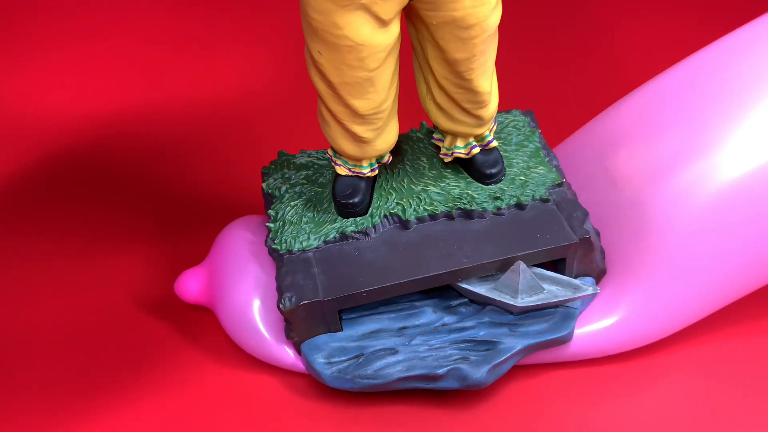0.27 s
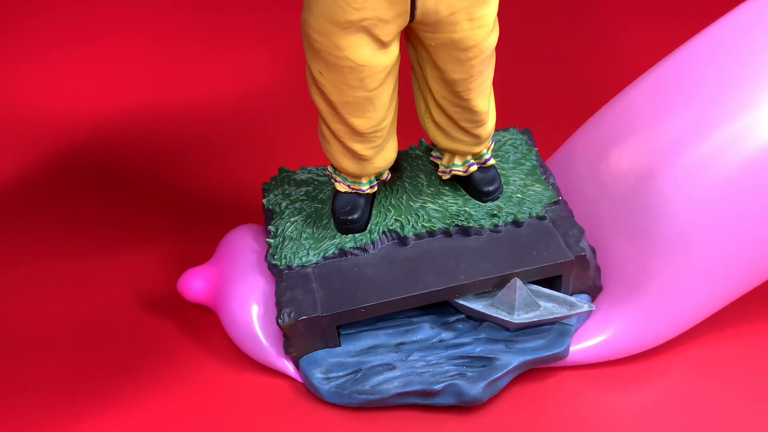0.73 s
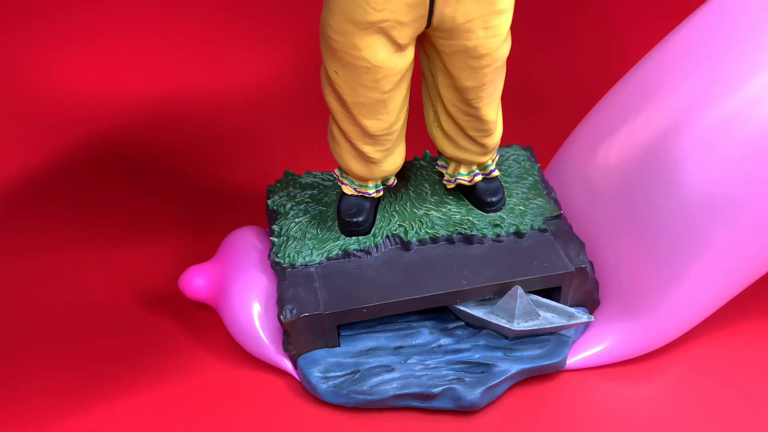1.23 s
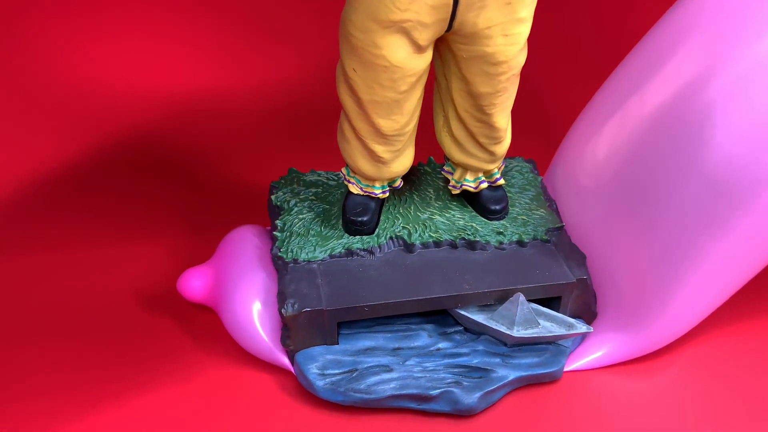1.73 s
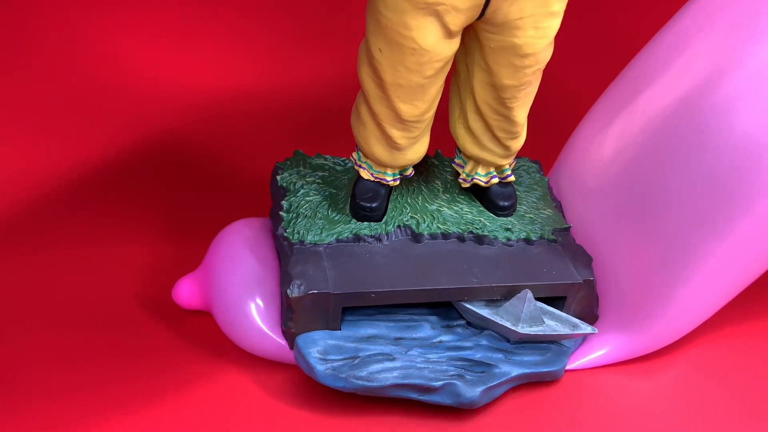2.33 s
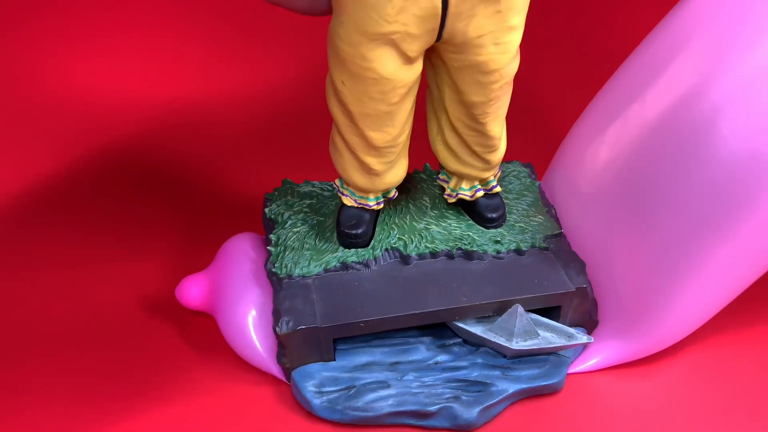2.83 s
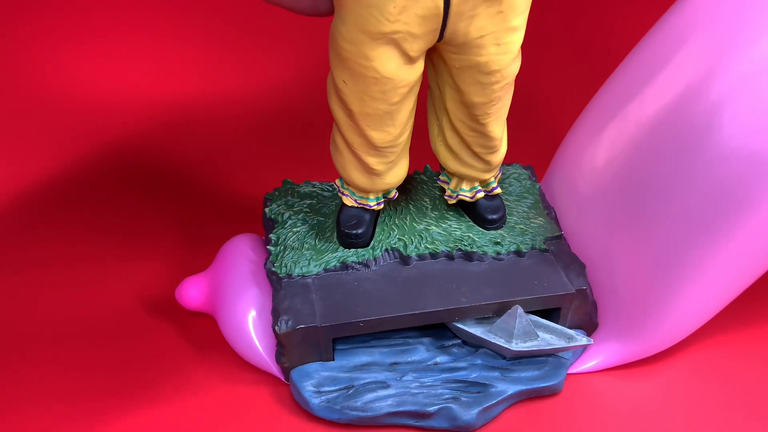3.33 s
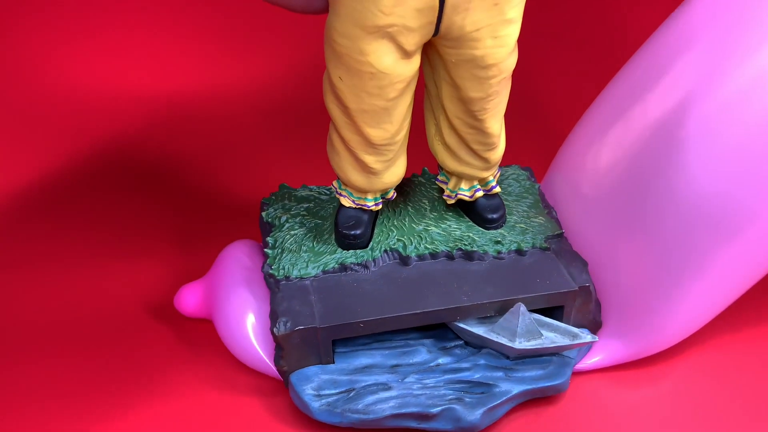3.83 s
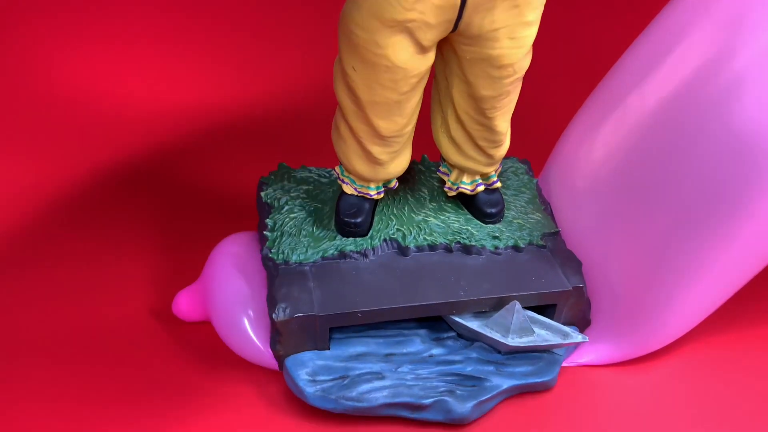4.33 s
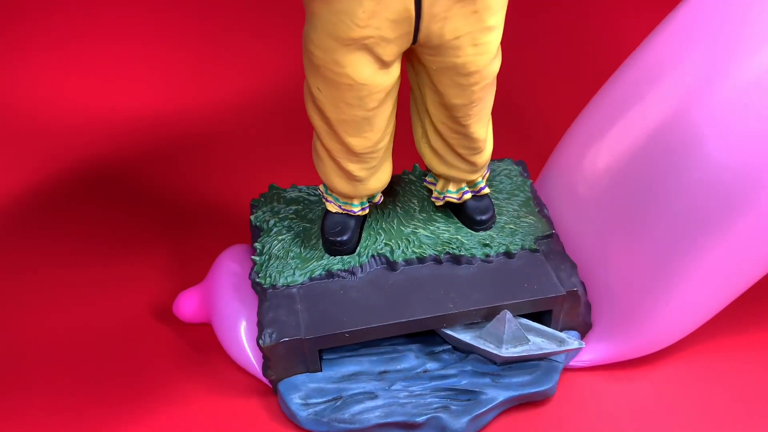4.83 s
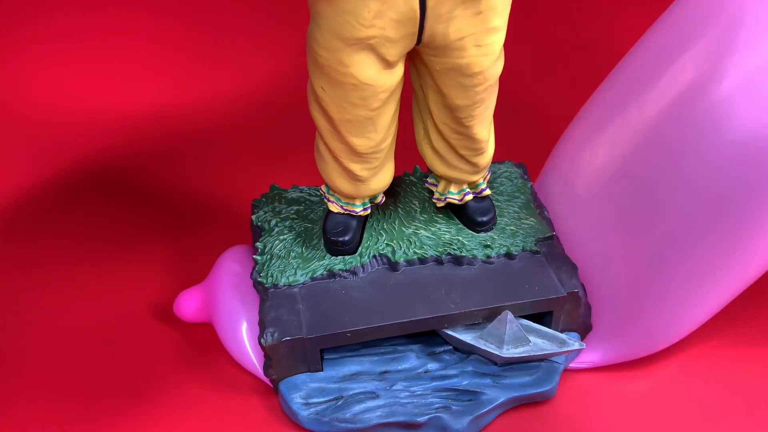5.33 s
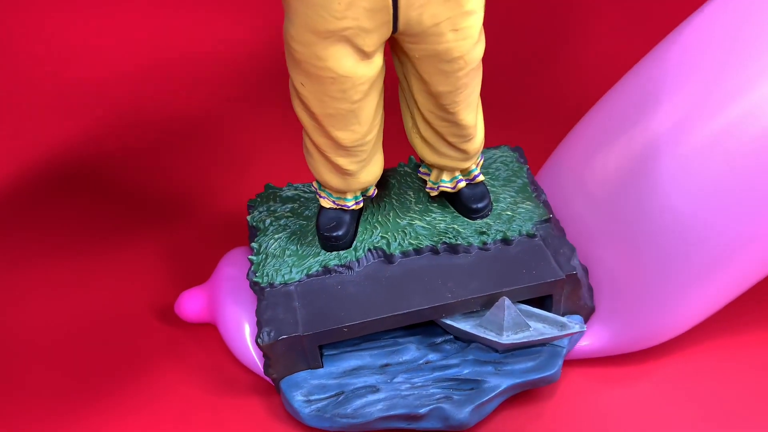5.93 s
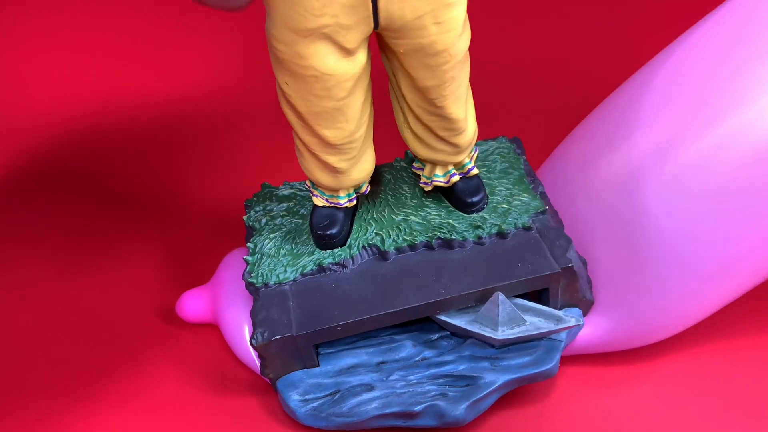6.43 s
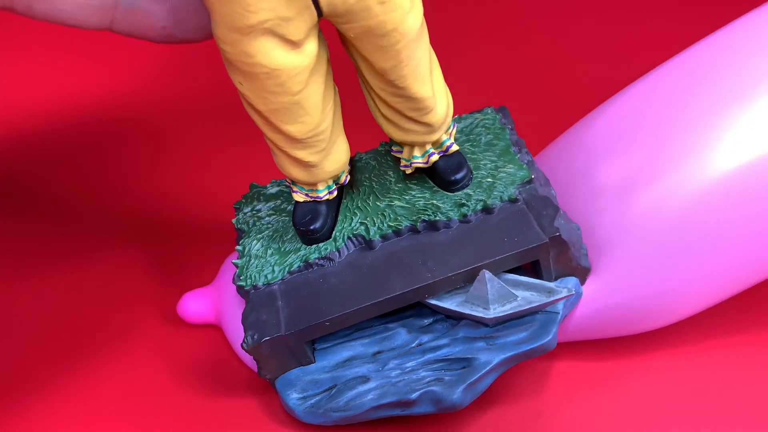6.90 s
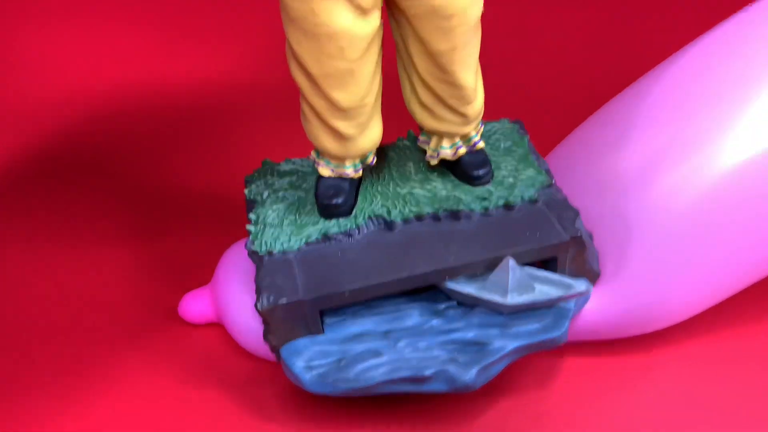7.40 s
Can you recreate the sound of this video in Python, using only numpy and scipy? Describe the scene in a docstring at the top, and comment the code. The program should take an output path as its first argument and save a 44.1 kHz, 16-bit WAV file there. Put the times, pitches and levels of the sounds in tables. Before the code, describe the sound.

A hard base is pressed and rocked on an inflated rubber balloon, its tacky skin crackling and snapping sharply over soft hollow booms.

```python
"""Stick-slip on a rubber balloon

A hard base is pressed and rocked on an inflated balloon lying on a table, close to a spaced microphone pair.
The tacky skin peels in a fine crackle of random releases and slips in sharp snaps of filtered noise.
Jolts tap dully and ring the air inside as damped modes, and steady pressure makes those modes groan.
Low noise rumbles in the table; dull puffs, a faint scattered tail and a steady hiss complete the scene."""
import sys
import numpy as np
from scipy import signal
from scipy.fft import rfft, irfft, next_fast_len
from scipy.io import wavfile

SR = 44100
rng = np.random.default_rng(int(sys.argv[2]) if len(sys.argv) > 2 else 0)


def output_pcm(signal):
    """Save a mono or channel-first signal as 16-bit PCM at the path in sys.argv[1].

    Samples are clipped to [-1, 1] before scaling.
    """
    pcm = np.clip(np.atleast_2d(signal).T, -1, 1) * 32767
    wavfile.write(sys.argv[1], SR, np.round(pcm).astype(np.int16))


N = 337806
FFT_SIZE = next_fast_len(N + SR // 4)
HZ = np.maximum(np.arange(FFT_SIZE // 2 + 1) * SR / FFT_SIZE, 1)   # spectrum grid, kept above zero for logarithms


def from_db(db):
    """Level law: decibels to amplitude gain."""
    return 10 ** (np.asarray(db) / 20)


def rms_one(x):
    """Normalization: scale to rms 1."""
    return x / np.sqrt(np.mean(x ** 2) + 1e-20)


def in_time(rows):
    """Linear interpolation: the columns of a time curve at every sample."""
    s, *columns = np.transpose(rows)
    return [np.interp(np.arange(N) / SR, s, column) for column in columns]


def through(x, response):
    """Linear filtering: multiply the spectrum by a response on the HZ grid."""
    size = 2 * (len(HZ) - 1)
    return irfft(rfft(x, size) * response, size)[..., :N]


def colour(x, points):
    """Spectral shaping: a zero-phase gain curve, interpolated over log frequency."""
    hz, db = np.transpose(points)
    return through(x, from_db(np.interp(np.log(HZ), np.log(hz), db)))


def band(x, low_hz, high_hz):
    """Band limitation: a causal Butterworth band-pass."""
    sos = signal.butter(2, [low_hz, min(high_hz, .45 * SR)], "band", fs=SR, output="sos")
    return signal.sosfilt(sos, x + 1e-18)


def drift(rate_hz):
    """Random modulation: noise under a two-pole low-pass, scaled to rms 1."""
    r = np.exp(-80 * np.pi * rate_hz / SR)   # one step is 40 samples
    noise = rng.standard_normal(N // 40 + 2002)
    slow = signal.lfilter([1], [1, -2 * r, r * r], noise)[2000:]   # skip the filter's start
    return np.interp(np.arange(N) / 40, np.arange(len(slow)), rms_one(slow))


def ring(clicks, hz, t60_s):
    """Damped resonance: a unit click starts a decaying sine of height about 1."""
    r, w = from_db(-60 / (t60_s * SR)), 2 * np.pi * hz / SR
    return signal.lfilter([0, np.sin(w)], [1, -2 * r * np.cos(w), r * r], clicks + 1e-18)


def partly_alike(shape, own):
    """Partial coherence: two noises, one per microphone, each with a share of power of its own."""
    both, left, right = rng.standard_normal((3, *shape))
    own = np.clip(own, 0, 1)
    return np.sqrt(1 - own) * both + np.sqrt(own) * np.array([left, right])


def pair(x, lag_s, turn_rad):
    """Arrival-time difference: left hears the source lag_s later, its phase turned by a fixed angle."""
    turned_left = through(x[0], np.exp(1j * (turn_rad - 2 * np.pi * HZ * lag_s)))
    return np.array([turned_left, x[1]])


# Resonances of the taut skin beside the contact: pitch_hz [Hz], level_db [dB], t60_s [s]
DRUM_MODES = [(1930, -32, 0.0026), (2203, -21.5, 0.0053), (3280, -40.5, 0.0019)]
DRUM_WANDER_DB = 4   # rms wander of each resonance


def drum(x):
    """Modal response: the taut skin drums briefly, each pitch coming and going as the contact shifts."""
    out = 0
    for hz, level_db, t60_s in DRUM_MODES:
        out = out + from_db(level_db + DRUM_WANDER_DB * drift(6.2)) * ring(x, hz, t60_s)
    return out


# Spells of fine peeling as the base rocks: full_strength_s [s], held_s [s], treble_db [dB],
# swell [dB per s], fade [dB per s], body_db [dB against treble]
PEELING_SPELLS = [(0.0, 0.014, -54, 300, 226.5, 0.5), (0.18, 0.115, -66.5, 501, 400.5, 2.5),
                  (0.329, 0.025, -62, 499, 300, 0), (0.9, 0.021, -69.5, 201, 153.5, -2),
                  (1.2, 0.0076, -53, 181, 107.5, -10), (1.529, 0.027, -48, 171, 247, -4.5),
                  (1.77, 0.13, -42.5, 108.5, 81, -5.5), (2.02, 0.053, -54.5, 292, 99, -7),
                  (2.33, 0.048, -43.5, 174.5, 302.5, 0.5), (2.5, 0.024, -54.5, 201.5, 298.5, 0.5),
                  (2.64, 0.01, -54.5, 592.5, 100.5, -6.5), (2.802, 0.11, -46, 394.5, 141.5, -6),
                  (3.2, 0.01, -56, 202.5, 189.5, -10), (3.479, 0.02, -47.5, 302, 192.5, -5),
                  (3.68, 0.046, -44.5, 353.5, 91.5, -7), (4.112, 0.0068, -47, 599, 237.5, -4.5),
                  (4.222, 0.015, -34, 601.5, 74.5, -2), (4.733, 0.045, -43, 88.5, 197, -5.5),
                  (5.14, 0.01, -68, 317.5, 144.5, -8.5), (5.331, 0.02, -68, 114.5, 123.5, -29),
                  (5.533, 0.0084, -50.5, 350, 101, -2.5), (5.584, 0.018, -40.5, 399, 249.5, -3.5),
                  (6.001, 0.23, -66.5, 294, 79.5, -3), (6.267, 0.01, -50.5, 202.5, 77, -5.5),
                  (6.661, 0.15, -55, 149.5, 113.5, 0), (6.88, 0.015, -51.5, 66, 162.5, -1),
                  (7.362, 0.14, -58.5, 452, 96, 0), (7.48, 0.09, -41, 150, 150, -0.5)]
BELLY_FOLLOWS = 1.5   # dB of belly for each dB of body


def rubbing():
    """Exponential envelopes: each spell swells, holds and fades at its own pace, in treble, body and belly."""
    step = 32   # samples between envelope points
    t, gains = np.arange(0, N + step, step) / SR, 0
    for s, held_s, treble_db, swell, fade, body_db in PEELING_SPELLS:
        db = treble_db - swell * np.maximum(s - t, 0) - fade * np.maximum(t - s - held_s, 0)
        gains = gains + from_db(db + body_db * np.array([[0], [1], [BELLY_FOLLOWS]]))
    return [np.interp(np.arange(N) / SR, t, gain) for gain in gains]


# Spectrum shaping the skin's releases: pitch_hz [Hz], level_db [dB]
SKIN_SPECTRUM = [(300, -6), (1000, 3), (1500, 4), (2200, 9.5), (3000, 11.5), (4000, 15), (6500, 8),
                 (9000, 8.5), (11500, 10), (14500, 3.5), (16000, 2.5), (17000, -57)]
# Band in which the squeezed part answers the peeling: centre_hz [Hz], width_hz [Hz], level_db [dB against treble]
BELLY_BAND = (900, 800, -9)
# How strongly the squeezed part answers: time_s [s], level_db [dB]
BELLY_CURVE = [(1.0, 4), (2.8, -2), (4.0, -7), (5.7, -5), (7.4, 3)]
DENSER = 0.3   # dB of release rate for each dB of treble


def peel(per_s, spread_db, clump_db, rustle, own):
    """Stick-slip as shot noise: tiny clumped releases, denser in strong spells, each leave a short rustle."""
    treble, body, belly = rubbing()
    dense = np.clip(rms_one(treble), .001, 10) ** DENSER
    # skewed sizes make a few releases much stronger
    sizes = from_db(spread_db * np.minimum(rng.exponential(1, N), 4)) * rng.choice([-1, 1], N)
    chance = per_s * dense * from_db(clump_db * drift(25)) / SR
    ticks = sizes * (rng.random(N) < chance) / np.sqrt(dense)   # denser ticks are made weaker
    after_power = signal.lfilter([1], [1, -np.exp(-1 / (0.00088 * SR))], ticks ** 2)
    grains = ticks + rustle * np.sqrt(after_power) * partly_alike((N,), own)
    grains = colour(grains, SKIN_SPECTRUM)

    top = rms_one(band(grains, 4820, 22000))
    middle = rms_one(band(grains, 1360, 3870)) + 0.5 * rms_one(drum(grains))
    hz, width_hz, belly_db = BELLY_BAND
    answer = rms_one(band(grains, hz - width_hz / 2, hz + width_hz / 2))
    hollow = from_db(belly_db + in_time(BELLY_CURVE)[0] + 4.0 * drift(15)) * answer
    return treble * top + body * middle + belly * hollow


def room(x, t60_s):
    """Diffuse scattering: convolution with a dull decaying noise tail, drawn for each microphone."""
    t = np.arange(SR // 2) / SR
    noise = rms_one(band(rng.standard_normal((2, len(t))), 600, 6700))
    tail = noise * from_db(-60 * t / t60_s) * (t > .003)
    return signal.fftconvolve(x, tail, axes=1)[:, :N]


# Pressure on table and balloon: time_s [s], rumble_db [dB], groan_db [dB]
PRESSURE = [(0.0, -70, -63.5), (0.64, -88, -93.5), (0.77, -61, -71), (1.04, -71, -75), (1.53, -62, -60.5),
            (2.6, -66, -77.5), (2.83, -60, -59), (3.42, -71.5, -81), (3.57, -47.5, -59), (3.7, -56, -67),
            (3.93, -72, -79), (4.27, -63, -65), (4.5, -66, -77.5), (4.73, -58, -83.5), (5.03, -83, -97),
            (5.95, -80, -75.5), (6.72, -62, -56), (7.15, -88.5, -102), (7.47, -72, -42), (7.66, -73, -51.5)]


def rumble(lumpy_db):
    """Low-frequency coherence: lumpy noise in the table, nearly alike at both microphones."""
    mid, side = band(rng.standard_normal((2, N)), 6.0, 83)
    both = rms_one(mid + .2 * side * [[1], [-1]])
    return from_db(in_time(PRESSURE)[0] + lumpy_db * drift(12)) * both


# Spectrum of the steady hiss: pitch_hz [Hz], level_db [dB]
HISS_SPECTRUM = [(18, -26), (30, 3.5), (443, -3.5), (1530, -9.5), (6380, -8), (13000, -16.5),
                 (16500, -41.5)]


def hiss(level_db):
    """Stationary noise: steady hiss, independent at the two microphones."""
    return from_db(level_db) * rms_one(colour(rng.standard_normal((2, N)), HISS_SPECTRUM))


# Push after a jolt: level_db [dB against the jolt], rise_s [s], fall_s [s]
PUSH = (-45, 0.008, 0.018)


def shudder(clicks, hz):
    """Resonant forcing: a soft knock, then an unsteady push at the mode's pitch travels along the balloon."""
    def decaying(time_s):
        pole = np.exp((2j * np.pi * hz - 1 / time_s) / SR)
        return signal.lfilter([1], [1, -pole], clicks + 1e-18).real

    level_db, rise_s, fall_s = PUSH
    push = (decaying(fall_s) - decaying(rise_s)) * (1 + 0.3 * drift(40))
    return 0.41 * clicks + from_db(level_db) * hz / 670 * push   # high modes are stirred most


# Jolts of the whole balloon: start_s [s], level_db [dB], sharpness [dB per octave]
JOLT_EVENTS = [(0.759, -55, -21), (1.407, -42, 11), (1.51, -53, -1.5), (1.65, -48.5, 8), (1.906, -47.5, 10),
               (2.219, -44, 8.5), (2.701, -45.5, 6.5), (2.851, -47, 13), (3.094, -54, 12.5),
               (3.18, -59.5, -4), (3.548, -48.5, -1), (3.991, -53, 6), (4.09, -52, 11),
               (4.225, -45.5, -9.5), (4.621, -55, 9), (4.677, -44, -9.5), (5.776, -43, 9),
               (5.999, -51.5, 13), (6.094, -39, 13.5), (6.679, -49, 3.5), (7.359, -48.5, 0)]
# Modes of the air inside: pitch_hz [Hz], level_db [dB], t60_s [s], pan_db [dB, left over right]
AIR_MODES = [(136, -10, 0.33, 11), (165.5, -2, 0.36, 0.5), (206.5, -7, 0.25, 8), (300, -8, 0.2, 0.5),
             (354, -7.5, 0.22, -0.5), (551, -27.5, 0.13, 16.5), (674, -9, 0.1, 7), (767, -21, 0.013, 12.5)]


def air(spread_db, wobble_db, thud_db, mode_db):
    """Cavity modes: jolts strike them, sharper ones the higher; steady pressure makes the same air groan."""
    s, peak_db, sharp_db = np.transpose(JOLT_EVENTS)
    at = np.round(s * SR).astype(int)
    chance = rng.standard_normal((len(s), len(AIR_MODES)))
    power = np.zeros(N)
    power[at] = from_db(2 * (peak_db + thud_db))
    # the skin goes on shaking for a while after a jolt
    shake = np.sqrt(signal.lfilter([1], [1, -np.exp(-1 / (0.015 * SR))], power + 1e-18))

    stir, booms, hollow = rng.standard_normal(N), 0, 0
    for k, (hz, level_db, t60_s, pan_db) in enumerate(AIR_MODES):
        clicks, sides = np.zeros(N), from_db([[pan_db / 2], [-pan_db / 2]])
        clicks[at] = from_db(peak_db + level_db + sharp_db * np.log2(hz / 300) + spread_db * chance[:, k])
        # the shape of the balloon shifts while it rings, so each mode wavers
        booms = booms + sides * ring(shudder(clicks, hz), hz, t60_s) * from_db(wobble_db * drift(37))
        # only modes above 300 Hz colour the groan, with shorter ringing
        hollow = hollow + sides * (hz > 300) * rms_one(ring(stir, hz, 0.3 * t60_s))
    hollow = rms_one(rms_one(band(stir, 120, 620)) + from_db(mode_db) * hollow)
    groan = from_db(in_time(PRESSURE)[1] + 3.5 * drift(12))
    return booms + (from_db(-11.5) * shake + groan) * hollow


# Skin letting go of the base: start_s [s], level_db [dB], brightness [dB per octave about 6500 Hz]
SNAP_EVENTS = [(0.17, -29.5, 0), (0.25, -34, 2), (0.283, -36, -1), (0.9136, -41.5, 8), (1.1153, -22, 6.5),
               (1.1526, -21.5, 4), (1.1916, -6, 1.5), (1.4233, -26, 15), (1.477, -17.5, 9),
               (1.5074, -24, 4), (1.527, -21, 9), (1.5424, -16.5, 14.5), (1.5618, -25, 27),
               (1.648, -21.5, 3), (1.6832, -7, 2), (1.747, -21, 3), (1.7738, -9, 0.5), (1.783, -16.5, 1.5),
               (1.8397, -11.5, -0.5), (1.8448, -2.5, 4.5), (2.0041, -18, 3.5), (2.0276, -12.5, 6.5),
               (2.055, -20, 4.5), (2.3181, -17, -0.5), (2.3283, -15, 0), (2.3384, -12, 1),
               (2.35, -14.5, -0.5), (2.3638, -11.5, -1), (2.383, -11, 1), (2.798, -34, 24), (2.852, -7, 3),
               (2.896, -10, 0.5), (3.219, -29.5, 9.5), (3.452, -17.5, 1), (3.461, -10.5, 1.5),
               (3.4688, -10, 16), (3.4748, -10.5, 12.5), (3.483, -12, 11.5), (3.49, -12, 7.5),
               (3.4992, -11.5, 12), (3.5161, -11.5, 12), (3.6518, -26.5, 2), (3.6633, -16, 3),
               (3.689, -13, 16.5), (3.7003, -19, 3), (3.7127, -16.5, 3), (3.7304, -17.5, 6),
               (3.775, -13, 6), (3.854, -14.5, 6.5), (3.885, -14, 5), (3.961, -10, 4), (4.11, -19.5, 0.5),
               (4.192, -27.5, -0.5), (4.207, -9.5, 5), (4.2174, -11, -1), (4.223, -16.5, 16),
               (4.2362, -14, -4.5), (4.2423, -16, -1.5), (4.255, -11.5, 0.5), (4.273, -16.5, 2),
               (4.2997, -13, 1), (4.3069, 1.5, 4.5), (4.3445, -17, 1), (4.4, -32.5, -1.5),
               (4.423, -13.5, 0), (4.4899, -28.5, 9.5), (4.663, -17.5, 10.5), (4.6968, -15, 9.5),
               (4.7447, -13, 3.5), (4.7577, -27, 3.5), (4.8428, -26, 2), (4.8962, -12.5, 4.5),
               (5.3482, -23.5, 10), (5.472, -30, 8), (5.567, -25, 0), (5.584, -23, 0), (5.6649, -9.5, 2.5),
               (6.0999, -11, 2.5), (6.2635, -18.5, -1), (6.313, -23, -2.5), (6.3782, -28.5, -4),
               (6.487, -22, 0), (6.679, -23, 6.5), (6.754, -19, 0.5), (6.8131, -29, 0), (7.0157, -33, 3),
               (7.158, -36, 4), (7.3129, -28, 18), (7.3267, -6, 0.5), (7.336, -10, 9), (7.359, -10.5, -3.5),
               (7.367, -8, 4.5), (7.3994, -3.5, 5), (7.407, -20, -1.5), (7.414, -7.5, -0.5),
               (7.427, -0.5, 4.5), (7.4394, -4, 1), (7.451, -9, 0.5), (7.4738, -20, -1.5),
               (7.4836, -29, -9.5), (7.5223, -23, -4.5), (7.549, -23, -6.5)]


def snaps(lead_in_db, rattle_db, rattle_s, own):
    """Stick-slip release: a faint noise swells for about 2 ms before each snap; low bands rattle longer after."""
    offsets = np.arange(-80, 400)   # samples around the release
    t = offsets / SR
    s, peak_db, tilt_db = np.transpose(SNAP_EVENTS)
    where = np.minimum(np.round(s * SR).astype(int)[:, None] + offsets, N - 1)
    draw = partly_alike(where.shape, own)
    release = np.sign(rng.standard_normal((len(s), 1))) * (t == 0)
    lead_in = from_db(lead_in_db) * draw * np.exp(t / 0.0021) * (t < 0)

    out, edges_hz = 0, [750, 1200, 1800, 3200, 6500, 10500, 19000]
    for low, high in zip(edges_hz, edges_hz[1:]):
        octaves = np.log2(low / 6500)
        longer = 2 ** (-.35 * octaves)
        rattle = from_db(rattle_db) * draw * np.exp(-np.abs(t) / (rattle_s * longer)) * (t > 0)
        gain = from_db(peak_db + tilt_db * octaves)[:, None]   # each snap has its own tilt
        train = np.zeros((2, N))
        np.add.at(train, (slice(None), where), gain * (lead_in + release + rattle))
        out = out + band(train, low, high)
        if low == 1800:   # this band's train also drums the skin
            out = out + drum(train)
    return colour(out, SKIN_SPECTRUM)


# Dull puffs: start_s [s], level_db [dB rms at the start]
PUFF_EVENTS = [(0.675, -56.5), (0.837, -59), (1.305, -54)]


def puffs(t60_s):
    """Exponential decay: sudden dull noise that dies away, independent at the two microphones."""
    t, level = np.arange(N) / SR, 0
    for s, db in PUFF_EVENTS:
        level = level + from_db(db - 60 * np.maximum(t - s, 0) / t60_s) * (t > s)
    return level * rms_one(band(rng.standard_normal((2, N)), 750, 2900))


# Contact noise of a jolt: low_hz [Hz], high_hz [Hz], level_db [dB against the jolt], decay_s [s]
KNOCK_NOISE = (897, 2298, -6, 0.003)


def knocks():
    """Impact noise: each jolt begins with a short dull tap, stronger when the jolt is sharp."""
    s, peak_db, sharp_db = np.transpose(JOLT_EVENTS)
    low_hz, high_hz, level_db, decay_s = KNOCK_NOISE
    power = np.zeros(N)
    power[np.round(s * SR).astype(int)] = from_db(2 * (peak_db + level_db + 0.73 * sharp_db))
    envelope = np.sqrt(signal.lfilter([1], [1, -np.exp(-2 / (decay_s * SR))], power + 1e-18))
    return band(envelope * partly_alike((N,), own=0.25), low_hz, high_hz)


def scene():
    """Superposition: skin sounds come from the right, the booming air from the left."""
    skin = peel(per_s=2000, spread_db=7.0, clump_db=6.0, rustle=0.58, own=0.55)
    skin = skin + snaps(lead_in_db=-27.5, rattle_db=-17.5, rattle_s=0.0014, own=0.33)
    boom = air(spread_db=1.5, wobble_db=2.5, thud_db=4.0, mode_db=-12.5) + knocks()
    direct = pair(skin, 0.000638, 0.92) + pair(boom, -0.00053, 0.81)
    scattered = from_db(-43.5) * room(skin, t60_s=0.3)
    return direct + scattered + puffs(t60_s=0.31) + rumble(lumpy_db=2.0) + hiss(level_db=-79.5)


def record(dry):
    """Low-pass filtering: the top is cut steeply, 70 dB down from 17400 Hz."""
    return signal.sosfilt(signal.cheby2(12, 70, 17400, fs=SR, output="sos"), dry)


dry = scene()
out = record(dry)
output_pcm(out)
```